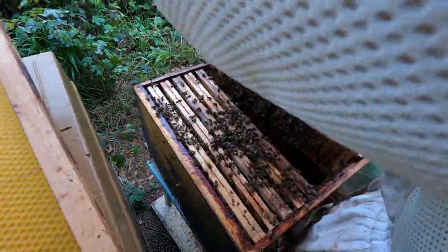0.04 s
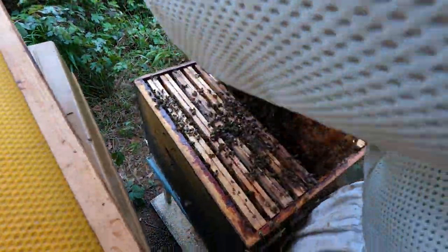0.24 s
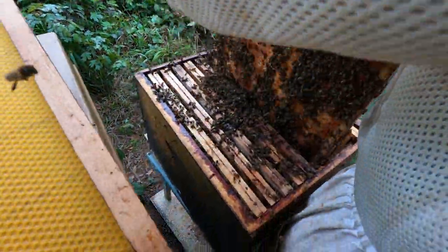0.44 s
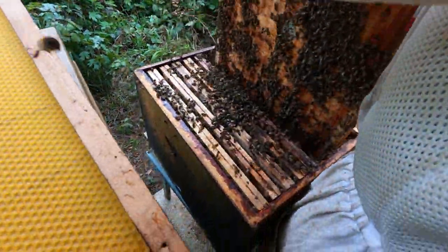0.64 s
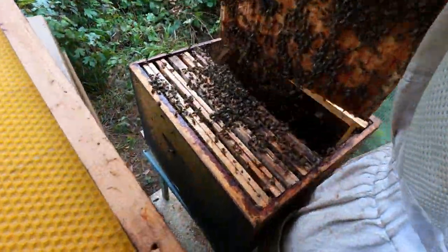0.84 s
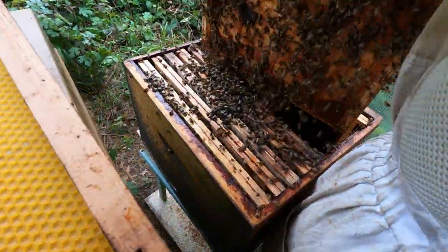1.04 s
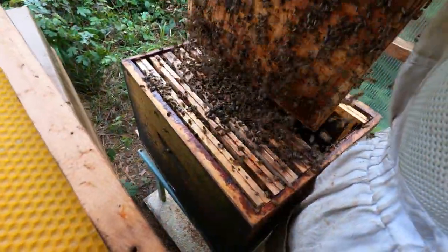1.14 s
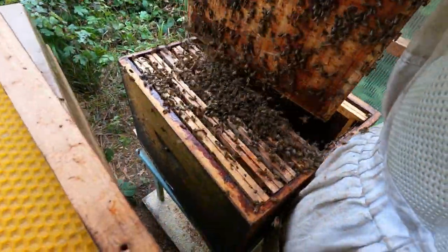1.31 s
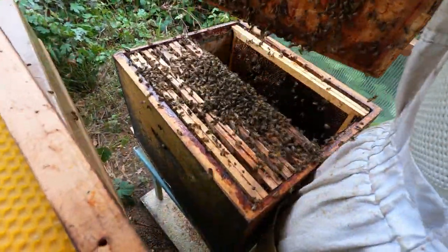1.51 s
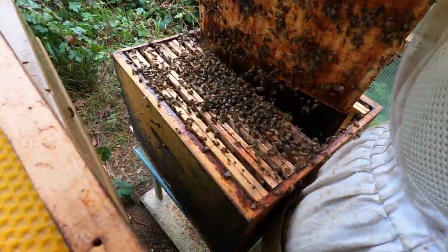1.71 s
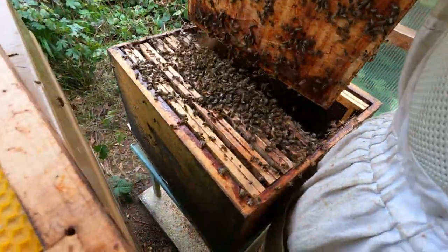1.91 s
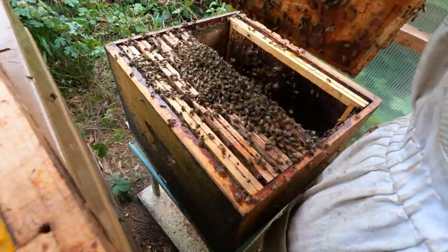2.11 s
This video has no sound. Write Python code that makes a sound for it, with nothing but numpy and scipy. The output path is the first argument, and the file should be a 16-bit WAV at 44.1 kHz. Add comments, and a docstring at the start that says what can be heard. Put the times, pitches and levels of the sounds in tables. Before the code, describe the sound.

Honeybees hum densely over an open hive as a wooden frame knocks and jolts.

```python
"""Honeybees hum over an open wooden hive, outdoors, close to a camera's microphone.
Their wingbeats make the hum; their legs and wings on the comb make a grainy hiss.
A comb frame is lifted out: it knocks the hollow box, scrapes it, then is jerked twice.
Bees shower off with a hiss and one flies past the microphone, over a low rumble of wind and clothing.
The camera's limiter ducks after the hard knocks and slowly recovers."""
import sys
import numpy as np
from scipy import signal
from scipy.fft import rfft, irfft, next_fast_len
from scipy.io import wavfile
from scipy.ndimage import map_coordinates

SR = 44100
rng = np.random.default_rng(int(sys.argv[2]) if len(sys.argv) > 2 else 0)


def bounce(signal):
    """Save signal as a 16-bit WAV file at the path given by the first command-line argument."""
    frames = np.transpose(np.atleast_2d(signal))
    limited = np.clip(frames, -1, 1)
    pcm = np.round(limited * 32767).astype(np.int16)
    wavfile.write(sys.argv[1], SR, pcm)


N = 94815


def swarm():
    """Many bees beat their wings over the hive, each drifting in pitch and distance."""
    # swell of the hum, stirred up by the lift: time_s, relative_db
    swell = [(0, -37), (.16, -37), (.25, -36.5), (.5, -36), (.75, -36), (.87, -36), (.98, -39.5),
             (1.1, -32), (1.2, -30), (1.35, -32.5), (1.5, -33.5), (1.64, -35.5), (1.77, -30.5),
             (1.88, -30.5), (1.98, -33), (2.08, -35), (2.15, -32.5)]
    # overtone colour of a wingbeat: frequency_hz, gain_db
    buzz_tone = [(100, -9), (210, -5), (440, 4), (660, -6.5), (1150, -7.5), (1900, -16.5), (3500, -26.5),
                 (7000, -32.5), (15000, -43)]
    bee_count, wing_hz, swing_db = 36, 213.93, 1
    spread, wander, flutter = 0.13, 0.055, 0.018  # natural-log shares of the pitch
    hum = np.zeros(N)
    for rank in np.linspace(-1, 1, bee_count):
        detune = spread * np.arctanh(rank * np.tanh(2))  # most bees sit near the middle pitch
        pitch_hz = wing_hz * np.exp(detune + wander * wobble(6) + flutter * wobble(45))
        hum += amp(swing_db * wobble(7.114)) * wingbeat(pitch_hz, buzz_tone)
    level_db, = curves(swell)
    return unit(hum) * amp(level_db - 1)


def close_bee():
    """A shaken-off bee passes right by the microphone, its pitch sinking."""
    # flight past the microphone: time_s, pitch_hz, level_db
    flight = [(1.15, 270, -42), (1.24, 252.2, -37.5), (1.28, 239.9, -34.5), (1.32, 225.2, -28),
              (1.39, 220, -36), (1.46, 227.2, -37), (1.53, 210.1, -47), (1.6, 196.2, -44), (1.68, 190, -48)]
    # overtone colour at close range: frequency_hz, gain_db
    close_tone = [(220, 1.5), (440, -3), (660, -12.5), (1100, -26), (2500, -42), (8000, -53)]
    pitch_hz, level_db = curves(flight)
    near = (clock() > flight[0][0]) & (clock() < flight[-1][0])
    wavering_hz = pitch_hz * (1 + 0.0065 * wobble(50))
    return near * amp(level_db) * wingbeat(wavering_hz, close_tone)


def wingbeat(pitch_hz, tone, harmonics=48):
    """One wing stroke repeats along a pitch curve, its overtones weighted by tone."""
    gains = along(tone, pitch_hz.mean() * np.arange(1, harmonics + 1))
    phases = np.exp(2j * np.pi * rng.random(harmonics))
    cycle = unit(irfft(np.r_[0, gains * phases], 2048))
    position = np.cumsum(pitch_hz) / SR % 1
    return np.interp(position, np.linspace(0, 1, len(cycle) + 1), np.r_[cycle, cycle[0]])


def rustle():
    """Legs and wings on comb and top bars make a fine, grainy hiss."""
    # surges of bees scrambling and falling: time_s, relative_db
    surges = [(0, -56), (.11, -57), (.15, -49.5), (.19, -54), (.22, -50), (.6, -49.5), (.8, -48),
              (.92, -53.5), (1.07, -43), (1.35, -43), (1.58, -47.5), (1.72, -41.5), (2.15, -49.5)]
    # colour of the hiss: frequency_hz, gain_db
    hiss_tone = [(300, -10), (1500, 2.5), (3300, 2.5), (5000, -1), (7000, 1), (8700, -1.5), (10500, -7.5),
                 (15500, -16)]
    level_db, = curves(surges)
    grains = noise(hiss_tone) * amp(0.96 * wobble(230))
    return amp(level_db + 1.5) * unit(grains)


def box_knocks():
    """The frame knocks against the hollow hive box and sets it ringing."""
    # blows on the box: start_s, ring_db, click_db, soft_hz, spot (0 to 1)
    knocks = [(.2148, -2, -16.5, 2500, 0.08), (.2715, 3.5, -7, 2000, 0.82), (.445, -11, -23, 700, 0.76),
              (0.605, -29, -53, 245, 0.2)]
    # modes of the box: pitch_hz, t60_s, spot_0_db, spot_1_db
    box_modes = [(126, 0.11, -7, -45), (180, 0.093, -19, -13), (283.4, 0.17, -6.5, -5.5),
                 (299.8, 0.089, 2, -2), (337.5, 0.11, -17, -3.5), (428.6, 0.1, -10, -10),
                 (449.4, 0.07, -48, 5.5), (537, 0.18, -35, -24), (703, 0.085, -20, -43),
                 (917, 0.034, -10, -16), (1105, 0.061, -24, -18), (1620, 0.03, -17, -19)]
    # colour of the contact click: frequency_hz, gain_db
    click_tone = [(30, -33), (150, 4), (600, 12.5), (1300, -9), (2600, -12), (5000, -26), (15000, -46)]
    return struck_wood(knocks, box_modes, click_tone, attack_s=0.0018, low_hz=117)


def frame_jolts():
    """Two sharp jerks ring the comb frame."""
    # jerks of the frame: start_s, ring_db, click_db, soft_hz, spot (0 to 1)
    jolts = [(1.1162, -5, -19.5, 1310, 0), (1.7272, -10, -13, 1840, 1)]
    # modes of the frame: pitch_hz, t60_s, spot_0_db, spot_1_db
    frame_modes = [(62, .17, -17, -20), (140, 0.14, -30, -10.5), (204, 0.12, -8.5, -3),
                   (294.5, 0.074, -2, -6), (337, .05, 1.5, -39), (431, 0.08, -9, 0.5),
                   (555.4, 0.083, -4, -9.5), (591, 0.052, -40, 1.5), (737, 0.015, -26, -23),
                   (1290, 0.032, -8, -30)]
    # colour of the contact click: frequency_hz, gain_db
    click_tone = [(30, -22), (150, 9), (600, 6), (1300, -4), (2600, -15.5), (5000, -18), (15000, -50)]
    return struck_wood(jolts, frame_modes, click_tone, attack_s=0.0025, low_hz=40.3)


def struck_wood(blows, modes, click_tone, attack_s, low_hz):
    """Each blow clicks and rings the wood's modes; the spot struck sets their balance."""
    click_t60_s = 0.029
    radiation = signal.butter(2, low_hz, "highpass", fs=SR)  # the wood radiates little below low_hz
    out = np.zeros(N)
    for start_s, ring_db, click_db, soft_hz, spot in blows:
        age_s = np.maximum(clock() - start_s, 0)
        ring = np.zeros(N)
        for hz, t60_s, spot_0_db, spot_1_db in modes:
            mode_db = spot_0_db + spot * (spot_1_db - spot_0_db)
            softening = np.hypot(1, hz / soft_hz)  # a soft contact weakens the high modes
            ring += amp(mode_db - 60 * age_s / t60_s) / softening * np.sin(2 * np.pi * hz * age_s)
        ring *= 1 - np.exp(-age_s / attack_s)
        out += amp(ring_db) * signal.lfilter(*radiation, ring)
        out += amp(click_db) * burst(start_s, click_t60_s, lambda hz: along(click_tone, hz))
    return out


def scrapes():
    """The frame's lug slides briefly on the box, wood on wood."""
    # slides of the lug: peak_s, level_db, length_s
    slides = [(0.827, -25.5, 0.022), (0.858, -31.5, 0.027)]
    # colour of the friction: frequency_hz, gain_db
    scrape_tone = [(60, -42), (170, -22), (300, -1), (470, 3.5), (620, -12.5), (840, -2.5), (1000, -15.5),
                   (2200, -26.5), (5000, -29), (15000, -50)]
    strokes = sum(amp(level_db) * bell(peak_s, length_s) for peak_s, level_db, length_s in slides)
    friction = noise(scrape_tone) * amp(0.93 * wobble(236.5))
    return strokes * unit(friction)


def handling():
    """Wood and wax tick and bump as the frame is moved."""
    # small contacts: start_s, level_db, centre_hz, width_octaves, t60_s
    ticks = [(.133, -28, 1400, 0.87, 0.0076), (0.141, -33, 6260, 0.44, 0.0072),
             (.158, -17.5, 930, 0.82, 0.0073), (0.1741, -30, 980, 0.96, 0.01),
             (0.2106, -12.5, 830, 0.73, .012), (0.213, -37, 4940, 1.4, 0.026),
             (.268, -18.5, 1380, 1.02, 0.015), (0.747, -32.5, 3770, 1.2, 0.045),
             (0.8207, -33, 3600, 0.28, 0.034), (1.1128, -27, 3340, .35, 0.023),
             (1.122, -30.5, 7000, 0.15, 0.0076), (1.7288, -22.5, 2350, 0.43, 0.024)]
    # dull bumps: peak_s, level_db, pitch_hz, length_s
    bumps = [(.163, -22.5, 162, 0.0098), (.612, -29, 175, 0.014), (.96, -37, 130, 0.022),
             (1.045, -35, 136, 0.035), (1.645, -43, 82.4, 0.028), (1.809, -45.5, 64.4, 0.11)]
    out = np.zeros(N)
    for start_s, level_db, centre_hz, width_octaves, t60_s in ticks:
        band = lambda hz: 1 / (1 + (np.log2((hz + 1) / centre_hz) / width_octaves) ** 2) ** 1.68
        out += amp(level_db) * burst(start_s, t60_s, band)
    for peak_s, level_db, pitch_hz, length_s in bumps:
        tone = np.sin(2 * np.pi * pitch_hz * (clock() - peak_s))
        out += amp(level_db) * bell(peak_s, length_s) * tone
    return out


def rumble():
    """Wind and clothing rumble faintly at the microphone."""
    # rise and fall of the rumble: time_s, relative_db
    gusts = [(0, -5.5), (.12, -4.5), (.2, -3), (.35, -1.5), (.7, -4.5), (1, -4.5), (1.2, 4.5), (1.4, -9),
             (1.75, 4), (1.9, -5), (2.15, -10.5)]
    # colour of the rumble: frequency_hz, gain_db
    air_tone = [(20, -27), (60, -7), (130, -3), (300, 3), (1000, -23.5), (8000, -31)]
    air_db = -42
    gust_db, = curves(gusts)
    return amp(air_db + gust_db + 0.83 * wobble(12.4)) * noise(air_tone)


def amp(db):
    """Decibels to gain."""
    return 10 ** (np.asarray(db) / 20)


def unit(x):
    """Scale to rms 1."""
    return x / np.sqrt(np.mean(x ** 2) + 1e-20)


def clock():
    """Seconds at each sample."""
    return np.arange(N) / SR


def bell(peak_s, length_s):
    """A smooth rise and fall around peak_s."""
    return np.exp(-(2 * (clock() - peak_s) / length_s) ** 2)


def along(tone, hz):
    """Gain at hz, from rows of frequency_hz, gain_db on a log axis."""
    frequency_hz, gain_db = np.transpose(tone)
    return amp(np.interp(np.log(hz + 1), np.log(frequency_hz + 1), gain_db))


def curves(rows):
    """One value per sample for each column after the time."""
    time_s, *columns = np.transpose(rows)
    return [np.interp(clock(), time_s, column) for column in columns]


def wobble(knots_per_s):
    """A smooth random curve."""
    knots = rng.standard_normal(512)
    coarse_s = clock()[::64]
    spline = map_coordinates(knots, [coarse_s * knots_per_s + rng.random()], mode="mirror")
    return np.interp(clock(), coarse_s, spline)


def filtered(x, response):
    """Shape the spectrum of x by a response of frequency."""
    size = next_fast_len(N + SR // 4)
    return irfft(rfft(x, size) * response(np.fft.rfftfreq(size, 1 / SR)), size)[:N]


def noise(tone):
    """Coloured noise of rms 1."""
    return unit(filtered(rng.standard_normal(N), lambda hz: along(tone, hz)))


def burst(start_s, t60_s, response):
    """A puff of noise that dies away, coloured by a response."""
    age_s = clock() - start_s
    decay = (age_s >= 0) * amp(-60 * np.maximum(age_s, 0) / t60_s)
    colour_rms = np.sqrt(np.mean(response(np.arange(SR // 2)) ** 2))
    return filtered(rng.standard_normal(N) * decay, response) / colour_rms


def scene():
    """Bees and woodwork at close range over a low outdoor rumble, in mono."""
    bees = swarm() + close_bee() + rustle()
    wood = box_knocks() + frame_jolts() + scrapes() + handling()
    return (bees + wood + rumble())[None]


def record(dry):
    """The microphone feeds a limiter with slow release, then soft clipping and a treble cut."""
    limit_db, attack_s, release_db_per_s = -8.5, 0.011, 20
    clip_db, top_hz = -7.4, 15800
    mic = dry[0]
    over_db = np.maximum(20 * np.log10(abs(mic) + 1e-9) - limit_db, 0)
    recovery_db = release_db_per_s * clock()
    duck_db = np.maximum.accumulate(over_db + recovery_db) - recovery_db  # catch peaks, let go slowly
    pole = np.exp(-1 / (attack_s * SR))
    limited = mic * amp(-signal.lfilter([1 - pole], [1, -pole], duck_db))
    clipped = limited / (1 + (abs(limited) / amp(clip_db)) ** 6) ** (1 / 6)
    return filtered(clipped, lambda hz: hz < top_hz)[None]


dry = scene()
out = record(dry)
bounce(out)
```